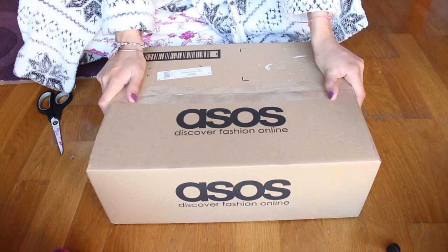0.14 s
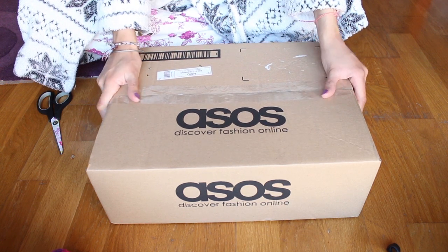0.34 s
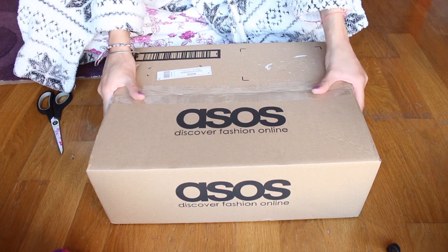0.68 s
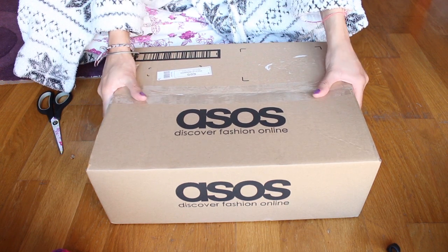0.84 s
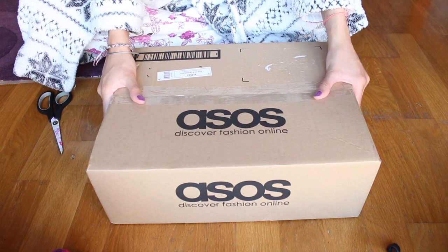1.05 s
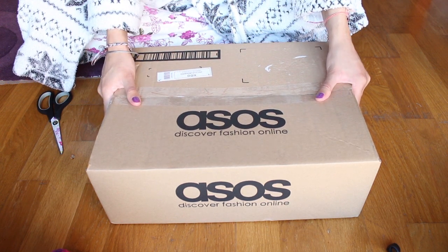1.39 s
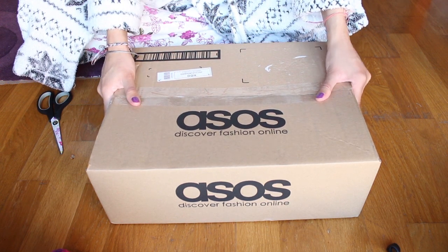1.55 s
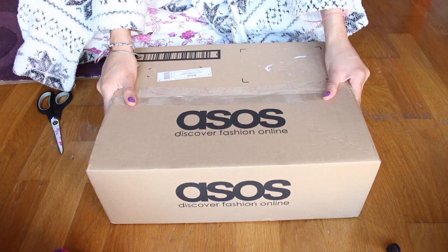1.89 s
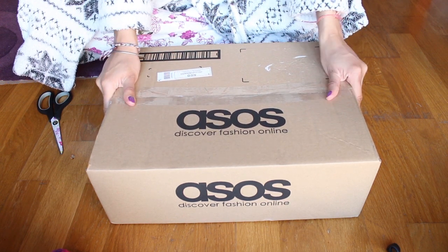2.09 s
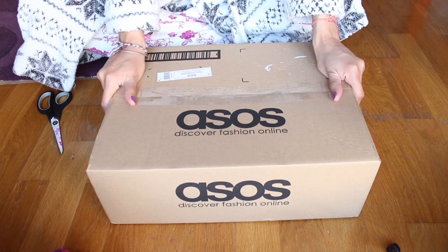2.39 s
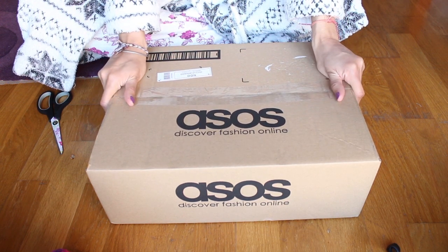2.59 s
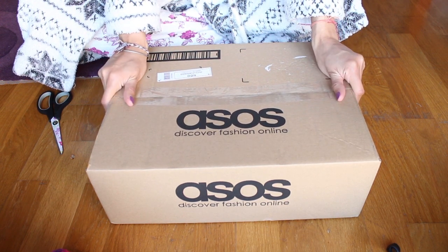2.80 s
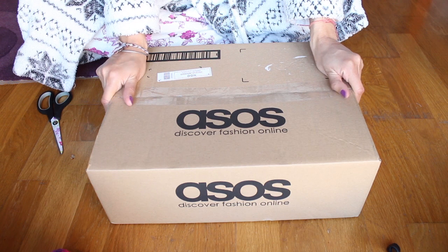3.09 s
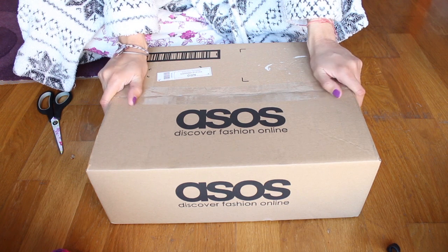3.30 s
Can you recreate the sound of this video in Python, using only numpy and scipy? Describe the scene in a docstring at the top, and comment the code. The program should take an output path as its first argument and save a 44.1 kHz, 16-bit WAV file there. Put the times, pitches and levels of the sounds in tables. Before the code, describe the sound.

Hands on a taped cardboard box, close up, over low room rumble. A bright nail snap cracks at once, with small ticks until 0.3. Skin hisses and scrapes around 0.4, with soft hollow bumps to 1.1. Ticks, crinkling tape and boomy knocks crowd 1.25-1.85. A knock and weaker snaps come at 2.05-2.3, then light rasps, sparse ticks, a low judder at 3.1, and a closing rub near 3.4.

```python
"""A bright nail snap jumps out of a low room rumble, while hands slide along a taped cardboard box.
The two hands feel for the edge of the tape: skin hisses and scrapes (shaped noise from tiny slips),
nails tick, snap and rasp on card and tape (short rings and noise), and pressed tape crinkles (clicks).
Fingertips bump the hollow box (struck tones) and one judders (a falling tone).
The quiet room answers softly with a fading noise tail."""
import sys
import numpy as np
from scipy import signal
from scipy.fft import rfft, irfft, next_fast_len
from scipy.io import wavfile
from scipy.ndimage import uniform_filter1d

SR = 44100
rng = np.random.default_rng(int(sys.argv[2]) if len(sys.argv) > 2 else 0)


def dump(signal):
    """Clip the signal to [-1, 1] and save it as 16-bit WAV at the path in sys.argv[1]."""
    limited = np.clip(np.atleast_2d(signal).T, -1, 1)
    pcm = np.round(limited * 32767).astype(np.int16)
    wavfile.write(sys.argv[1], SR, pcm)


N = 152145  # length in samples

# tone colour of tape under finger or nail: pitch_hz, relative_db
TAPE_COLOUR = [(600, -7), (2000, -4.5), (4000, -3), (9000, -4.5), (13000, -7), (16000, -11)]


def amp(db):
    """Turns decibels into gain."""
    return 10 ** (np.asarray(db) / 20)


def unit(x):
    """Scales a sound to an rms (average strength) of 1."""
    return x / np.sqrt(np.mean(x ** 2) + 1e-20)


def read(points, hz):
    """Reads a table between its points, along a log-frequency axis."""
    table_hz, value = np.transpose(points)
    return np.interp(np.log(hz + 1), np.log(table_hz), value)


def level(points):
    """Draws a gain curve over time through (time_s, level_db) points."""
    return amp(np.interp(np.arange(N) / SR, *np.transpose(points)))


def colour(x, spectrum):
    """Shapes how strong each frequency of a long noise is, then sets rms 1."""
    size = next_fast_len(N)
    gain = amp(read(spectrum, np.fft.rfftfreq(size, 1 / SR)))
    return unit(irfft(rfft(x, size) * gain, size)[:N])


def add(mix, start_s, sound):
    """Mixes a sound in at its start time."""
    part = mix[round(start_s * SR):][:len(sound)]
    part += sound[:len(part)]


def fade(t, t60_s):
    """Things that ring lose energy steadily: 60 dB down after t60_s seconds."""
    return np.exp(-np.log(1000) * t / t60_s)


def ring(hz, t60_s, rise_s):
    """One tone of a struck object: it rises quickly, then dies away."""
    t = np.arange(0, 2 * t60_s, 1 / SR)
    rise = 1 - np.exp(-(t / rise_s) ** 2)
    return np.sin(2 * np.pi * hz * t) * fade(t, t60_s) * rise


def swell(length_s):
    """A stroke rises and falls as half a sine wave."""
    return np.sin(np.linspace(0, np.pi, round(length_s * SR)))


def quiet_room():
    """Steady low rumble, and a weaker noise that differs between left and right."""
    # both: pitch_hz, relative_db
    rumble_colour = [(20, -23), (35, -24), (48, 3.5), (75, 7), (105, 0), (140, -7.5), (220, -25.5),
                     (400, -24), (900, -27.5), (3000, -39), (8000, -53), (16000, -52.5)]
    side_colour = [(30, 12), (80, 16.5), (200, 5.5), (500, 8), (1000, -36.5), (8000, -57), (16000, -35.5)]
    rumble = amp(-51) * colour(rng.standard_normal(N), rumble_colour)
    side_noise = amp(-72.5) * colour(rng.standard_normal(N), side_colour)
    return rumble, side_noise


def friction(spectrum, flutter_db):
    """Tiny slips of skin on paper fibres, under unsteady pressure."""
    slips_per_s, spread_db, slip_share = 2500, 1, 0.38  # share of the noise power
    happens = rng.random(N) < slips_per_s / SR
    size = amp(spread_db * np.minimum(rng.exponential(1, N), 4))
    slips = rng.standard_normal(N) * happens * size
    smooth = uniform_filter1d(rng.standard_normal(N), size=500)
    flutter = unit(uniform_filter1d(smooth, size=300))
    steady = rng.standard_normal(N)
    rub = np.sqrt(slip_share) * unit(slips) + np.sqrt(1 - slip_share) * steady
    return colour(rub, spectrum) * amp(flutter_db * flutter)


def sliding():
    """The hands hiss on the surface, scrape the card and set the panels droning."""
    # strength over time: time_s, level_db (the scrape is raised further below)
    hiss_level = [(0, -68), (.32, -74), (.37, -55), (.42, -50.5), (.52, -61), (.85, -61.5), (.98, -70.5),
                  (1.23, -73), (1.36, -58), (1.49, -66.5), (1.66, -66), (1.75, -56), (1.9, -67.5),
                  (2.02, -72), (2.14, -61), (2.22, -58.5), (2.33, -62.5), (2.55, -63.5), (2.63, -72),
                  (2.83, -65.5), (2.95, -69.5), (3.07, -68.5), (3.22, -76), (3.32, -64), (3.39, -50),
                  (3.45, -54.5)]
    scrape_level = [(0.0, -62), (0.22, -80), (0.38, -71), (0.53, -60), (0.61, -62), (0.76, -60.5),
                    (0.94, -65.5), (1.12, -80), (1.23, -66.5), (1.46, -64.5), (1.64, -64), (1.71, -55),
                    (1.88, -65), (2.1, -65), (2.25, -65.5), (2.4, -61), (2.55, -68), (3.11, -84.5),
                    (3.32, -76), (3.45, -64)]
    drone_level = [(0, -48.5), (.15, -57.5), (.42, -54), (.52, -51), (.9, -55.5), (.98, -65), (1.22, -60.5),
                   (1.33, -52), (1.62, -49.5), (1.74, -47.5), (1.98, -57), (2.12, -56.5), (2.52, -51),
                   (2.65, -60), (3.05, -58.5), (3.26, -64), (3.35, -45.5), (3.45, -51)]
    # tone colours: pitch_hz, relative_db
    hiss_colour = [(1000, -9.5), (2500, -1), (4300, -0.5), (5800, -1.5), (7200, -6.5), (8600, -4.5),
                   (10000, -7), (12000, -9), (14000, -20), (16000, -35)]
    scrape_colour = [(300, 17.5), (700, -3.5), (1100, -0.5), (1700, -0.5), (2800, -3), (4500, -16),
                     (8000, -25.5), (15000, -36)]
    drone_colour = [(60, 4), (130, -1), (215, 3.5), (280, 0.5), (360, -8.5), (440, -6.5), (520, -15),
                    (620, -8.5), (850, -21), (2000, -32)]
    hiss = level(hiss_level) * friction(hiss_colour, flutter_db=2.5)
    scrape = amp(4) * level(scrape_level) * friction(scrape_colour, flutter_db=3.8)
    drone = level(drone_level) * friction(drone_colour, flutter_db=1.6)
    return hiss + scrape + drone


def room(x):
    """Many blurred echoes build up and fade, faster in the treble."""
    # fading time at each pitch: pitch_hz, t60_s
    fade_times = [(100, 0.9), (500, 1), (2000, 0.7), (5000, 0.48), (9000, 0.39), (15000, 0.32)]
    build_s = 0.0068
    hz, t, pieces = signal.stft(rng.standard_normal(SR // 2), SR, nperseg=256)
    pieces = pieces * fade(t, read(fade_times, hz)[:, None])
    tail = signal.istft(pieces, SR, nperseg=256)[1]
    tail *= 1 - np.exp(-(np.arange(len(tail)) / SR / build_s) ** 2)
    return amp(-13.5) * signal.fftconvolve(x, tail / np.linalg.norm(tail))[:N]


def snaps():
    """A nail slips off the tape: a bright, short ring and a push on the lid; the room gets a crack."""
    # snaps: start_s, level_db, treble_tilt_db_per_octave, ring_length_factor,
    # lid_push_db, room_crack_db (before the scene's gain)
    snap_list = [(0.0357, -6.5, 1, 1, -25.5, -7.5), (2.1318, -16.5, -4, 0.44, -56, -36),
                 (2.2578, -15, 0.5, 0.84, -52, -15)]
    # tones of nail and tape: pitch_hz, relative_db, t60_s (before the length factor)
    nail_tones = [(3370, -11.5, 0.0035), (4150, -15, 0.0083), (4760, -16, 0.0076), (5630, -18, 0.0086),
                  (7520, -5.5, 0.0035), (8600, -7, 0.0047), (10740, -9, 0.0029), (12400, -2, 0.0019),
                  (14600, -17, 0.0015)]
    out, spray = np.zeros(N), np.zeros(N)
    band = signal.butter(1, (3630, 9500), "band", fs=SR)
    crack = signal.lfilter(*band, signal.unit_impulse(256))
    crack /= np.linalg.norm(crack)
    for start_s, snap_db, tilt_db, length, push_db, crack_db in snap_list:
        for k, (hz, tone_db, t60_s) in enumerate(nail_tones):
            gain = amp(snap_db + tone_db + tilt_db * np.log2(hz / 7000))
            sign = (-1) ** k  # every second tone starts downwards
            add(out, start_s, sign * gain * ring(hz, t60_s * length, rise_s=0.00016))
        add(out, start_s, amp(push_db) * ring(hz=440, t60_s=0.009, rise_s=0.00052))
        add(out, start_s, amp(push_db - 7) * ring(hz=1400, t60_s=0.0094, rise_s=0.00075))
        add(spray, start_s, amp(crack_db) * crack)
    return out, spray


def ticks():
    """Nails touch the card: a crack of noise and a local ring with a weaker overtone."""
    # ticks: start_s, ring_db (before the boost for short rings), pitch_hz, crack_db
    tick_list = [(.0645, -27, 3800, -36.5), (.0965, -34, 4480, -44), (.1814, -38, 1820, -46),
                 (.194, -36, 5430, -63), (.215, -38, 580, -49.5), (.2601, -39.5, 2250, -67),
                 (.5358, -43, 4700, -56), (1.1325, -41, 5400, -43), (1.1945, -38, 2720, -66),
                 (1.2243, -40.5, 2430, -56), (1.258, -51, 3320, -44.5), (1.2644, -17.5, 3110, -42.5),
                 (1.2808, -34, 3680, -44), (1.3252, -28, 2390, -49), (1.3723, -46, 3670, -41),
                 (1.4085, -36, 1600, -48), (1.4256, -38, 13200, -49), (1.4352, -31, 2940, -64),
                 (1.463, -31, 9000, -43), (1.519, -27, 1320, -42), (1.5343, -38, 8500, -41.5),
                 (1.5693, -37, 1470, -44.5), (1.5777, -46, 5200, -45), (1.6175, -28.5, 2790, -44.5),
                 (1.6629, -61, 2350, -60), (1.6771, -25.5, 1140, -39.5), (1.8163, -30, 2966, -35),
                 (2.0515, -45, 1400, -49), (2.057, -41, 1240, -44), (2.12, -36, 11100, -52),
                 (2.143, -46, 4270, -43), (2.222, -30, 11300, -58), (2.2305, -36, 8100, -49),
                 (2.5578, -34.5, 3000, -43), (2.8023, -29, 4130, -45.5), (2.8975, -43, 640, -56),
                 (2.9336, -35.5, 8500, -47), (2.9402, -38, 5860, -71), (3.1295, -44, 11700, -51),
                 (3.2695, -39, 700, -67), (3.3487, -44, 11900, -42), (3.371, -29, 4440, -40.5)]
    # tone colour of the crack: pitch_hz, relative_db
    crack_colour = [(300, 12), (1500, 2), (4000, 4), (8500, -1), (12000, -6.5), (16000, -33)]
    damp_hz = 4200  # rings above this die faster and spread wider
    out, t = np.zeros(N), np.arange(SR // 20) / SR
    noise = colour(rng.standard_normal(N), crack_colour)
    for k, (start_s, ring_db, hz, crack_db) in enumerate(tick_list):
        crack = noise[k * len(t):][:len(t)] * fade(t, t60_s=0.012)
        ratio = hz / damp_hz
        shorten = 1 / np.sqrt(1 + ratio ** 2 * max(ratio - 1, 0))
        t60_s, rise_s = 0.0054 * shorten, 0.00062 * shorten
        tone = ring(hz, t60_s, rise_s) + 0.37 * ring(hz * 1.41, t60_s, rise_s)
        add(out, start_s, amp(ring_db) * tone / np.sqrt(shorten))  # shorter rings are made stronger
        add(out, start_s, amp(crack_db) * crack)
    return out


def crinkles():
    """Pressed tape gives off clusters of tiny, sharp clicks."""
    # clusters: start_s, length_s, level_db
    clusters = [(0.163, 0.057, -65.5), (1.327, 0.12, -65.5), (1.508, 0.11, -64), (2.084, 0.053, -67),
                (2.92, 0.055, -71), (3.244, 0.096, -67.5)]
    clicks_per_s, spread_db = 260, 7.5
    out = np.zeros(N)
    happens = rng.random(N) < clicks_per_s / SR
    size = amp(spread_db * np.minimum(rng.exponential(1, N), 3))
    clicks = colour(rng.choice([-1, 1], N) * happens * size, TAPE_COLOUR)
    for start_s, length_s, cluster_db in clusters:
        cluster = clicks[round(start_s * SR):][:round(length_s * SR)]
        add(out, start_s, amp(cluster_db) * unit(cluster))
    return out


def knock(contact_s):
    """The cardboard panel rings at several pitches, all struck together."""
    # panel tones: pitch_hz, relative_db, t60_s
    panel_tones = [(159, -4.5, 0.081), (215, 3, 0.064), (258.4, -3.5, 0.06), (333.7, 0, 0.048),
                   (428, -3, 0.027), (617, -9.5, 0.034), (670, -18, 0.016), (1102, -25.5, 0.075)]
    out = np.zeros(SR // 2)
    for hz, tone_db, t60_s in panel_tones:
        add(out, 0, amp(tone_db) * ring(hz, t60_s, contact_s) / 2)
    return out


def bumps():
    """Soft fingertips knock the lid, and the air in the hollow box booms after it."""
    # bumps: start_s, boom_db, knock_db
    bump_list = [(.216, -50, -37), (.402, -31.5, -35.5), (0.878, -32.5, -50), (.916, -33, -38),
                 (1.031, -35.5, -36.5), (1.061, -47, -37.5), (1.26, -46, -30), (1.4458, -21, -27.5),
                 (1.515, -53, -29.5), (1.539, -31.5, -34.5), (1.5699, -24, -28.5), (1.664, -26, -40),
                 (1.6778, -25.5, -24.5), (1.7422, -32, -28), (1.7538, -29, -33), (1.8304, -48, -30.5),
                 (1.839, -30, -25), (2.04, -50, -32.5), (2.056, -34, -23), (2.781, -47, -38.5),
                 (2.895, -47, -35.5), (3.328, -32.5, -34), (3.3679, -31.5, -46)]
    out = np.zeros(N)
    boom = ring(hz=96, t60_s=0.098, rise_s=0.0045)
    panel = knock(contact_s=0.0015)
    for start_s, boom_db, knock_db in bump_list:
        add(out, start_s, amp(knock_db) * panel)
        add(out, start_s, -amp(boom_db) * boom)
    return out


def rasps():
    """A nail drags over the tape: a short swell of slips around one resonance."""
    # rasps: start_s, length_s, level_db (before the swell), pitch_hz
    rasp_list = [(0.347, 0.11, -55, 5600), (1.33, 0.06, -63, 7000), (2.09, .1, -62, 11000),
                 (2.431, 0.088, -58, 1580), (2.775, .12, -64, 4160), (3.0, 0.16, -72.5, 3900)]
    sharpness = 3.6  # Q: higher sounds more like one note
    out, slips = np.zeros(N), friction(TAPE_COLOUR, flutter_db=4)
    for start_s, length_s, rasp_db, hz in rasp_list:
        shape = swell(length_s)
        stretch = slips[round(start_s * SR):][:len(shape)]
        rung = signal.lfilter(*signal.iirpeak(hz, sharpness, SR), stretch)
        add(out, start_s, amp(rasp_db) * shape * unit(rung))
    return out


def judder():
    """A slowing fingertip sticks and slips over the lid: a low, falling tone."""
    start_s, length_s, peak_db = 3.125, 0.11, -42
    first_hz, last_hz = 140, 100
    out, shape = np.zeros(N), swell(length_s)
    pitch_hz = np.linspace(first_hz, last_hz, len(shape))
    tone = np.sin(2 * np.pi * np.cumsum(pitch_hz) / SR)
    add(out, start_s, amp(peak_db) * shape * tone)
    return out


def scene():
    """The box lies almost straight ahead; the room adds a little width."""
    snap, spray = snaps()
    nails = ticks()
    hands = bumps() + sliding() + rasps() + crinkles() + judder()
    rumble, side_noise = quiet_room()
    sent = hands + amp(-2.5) * nails + amp(4.5) * spray  # what the room echoes
    mid = hands + nails + snap + room(sent) + rumble
    lead_s = 0.000001  # the left side hears the middle sound this much before the right
    lead = lead_s * SR * np.gradient(mid) / 2
    side = amp(-17.5) * room(sent) + side_noise + lead
    return np.array([mid + side, mid - side])


def record(dry):
    """Filters weaken the bass below 33 Hz and the treble above 16.1 kHz."""
    bass_cut = signal.butter(3, 33, "high", fs=SR, output="sos")
    treble_cut = signal.firwin(255, 16100, window=("kaiser", 9), fs=SR)
    return signal.oaconvolve(signal.sosfilt(bass_cut, dry), treble_cut[None], "same")


dry = scene()
out = record(dry)
dump(out)
```